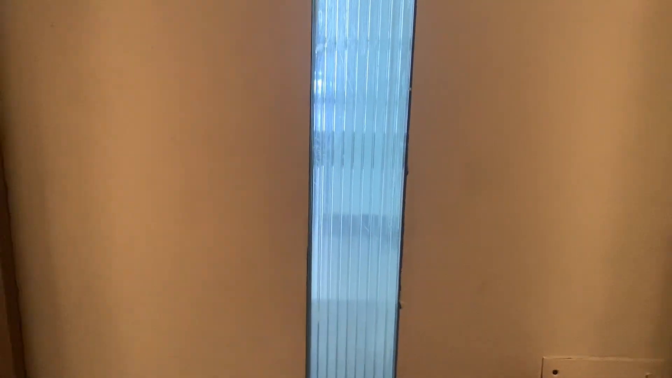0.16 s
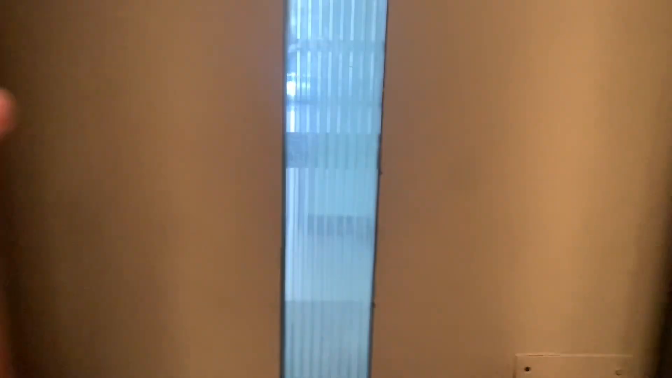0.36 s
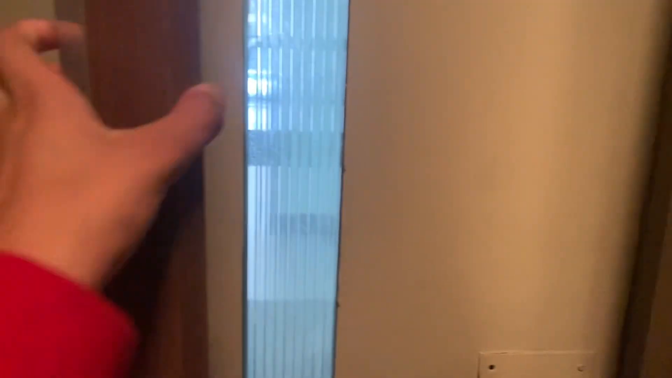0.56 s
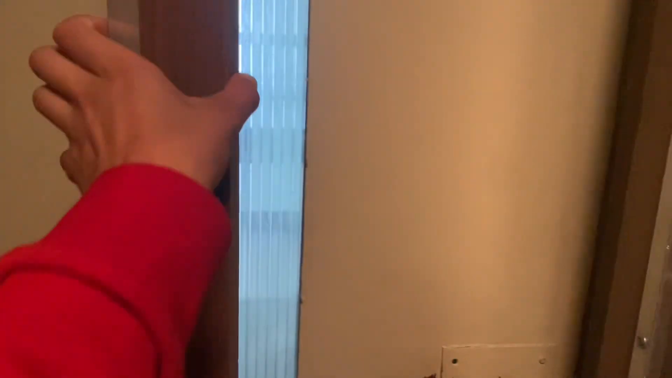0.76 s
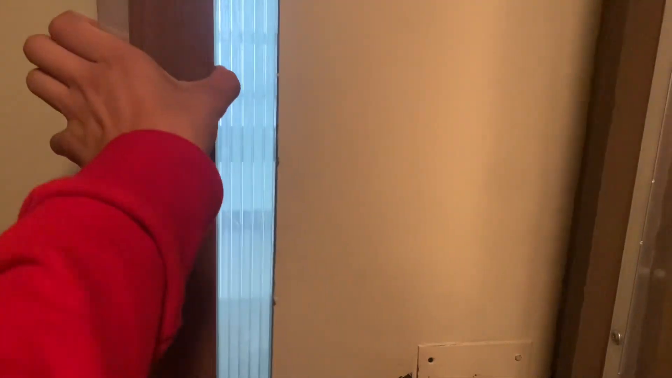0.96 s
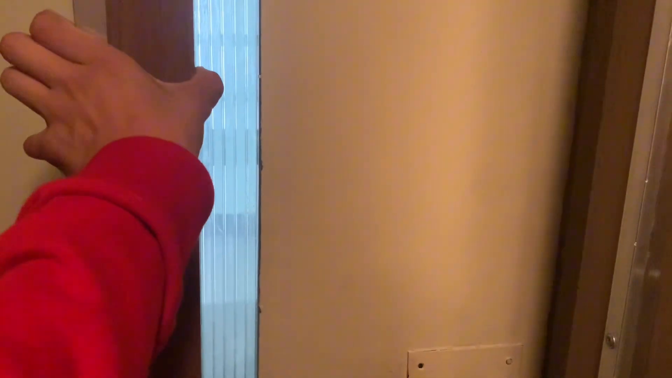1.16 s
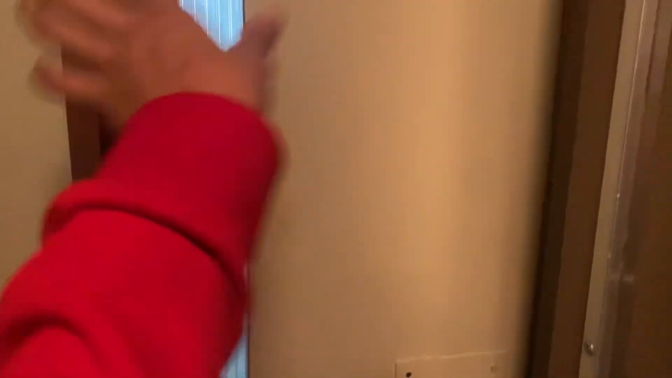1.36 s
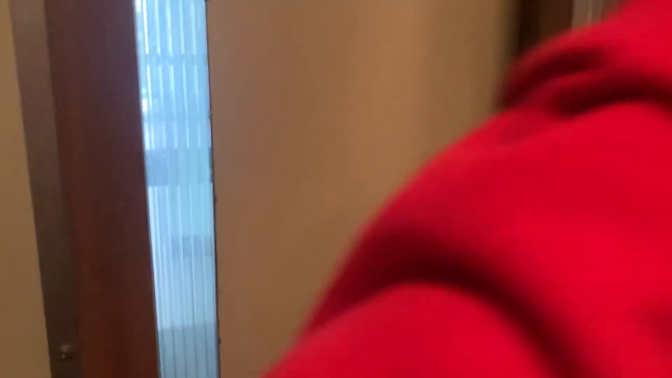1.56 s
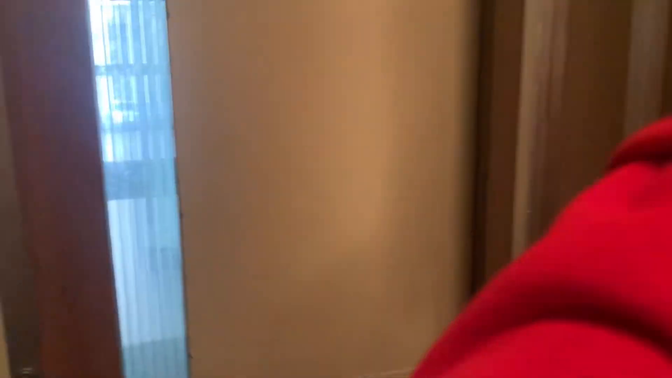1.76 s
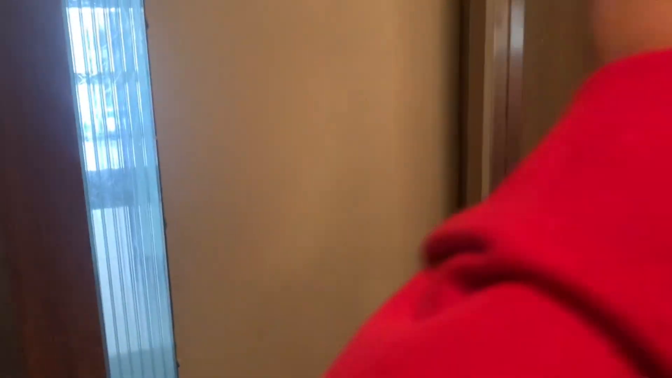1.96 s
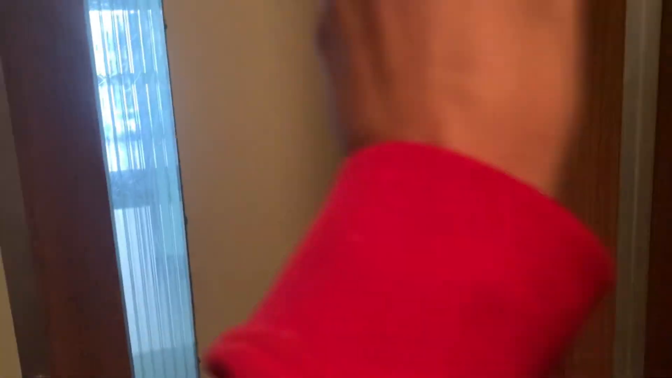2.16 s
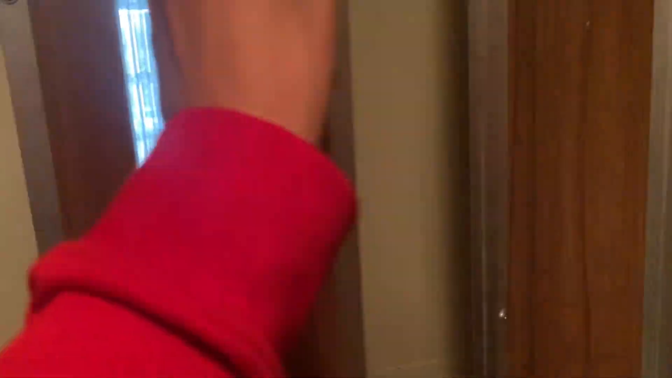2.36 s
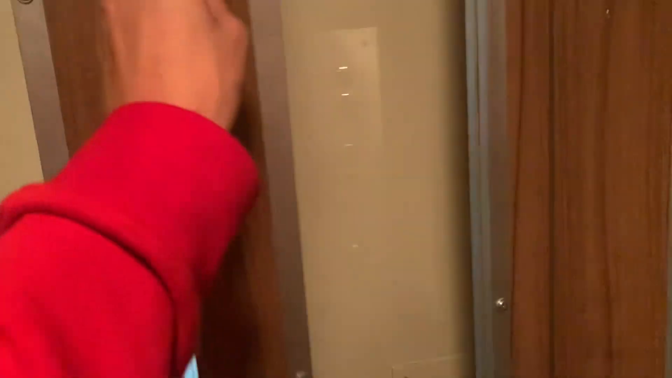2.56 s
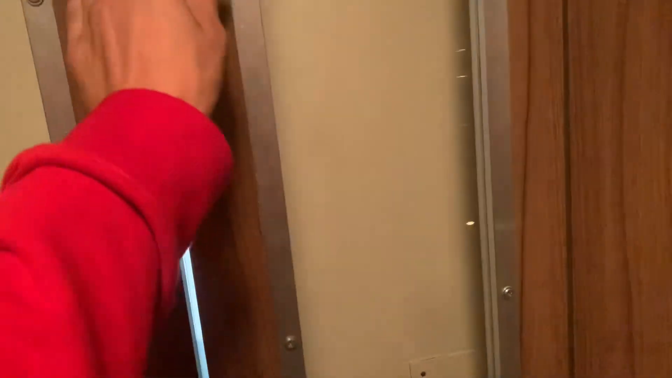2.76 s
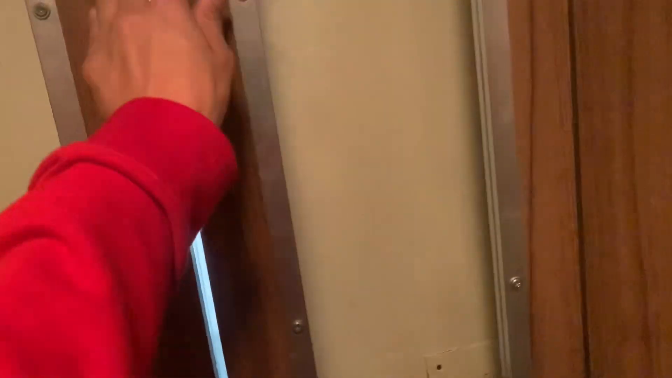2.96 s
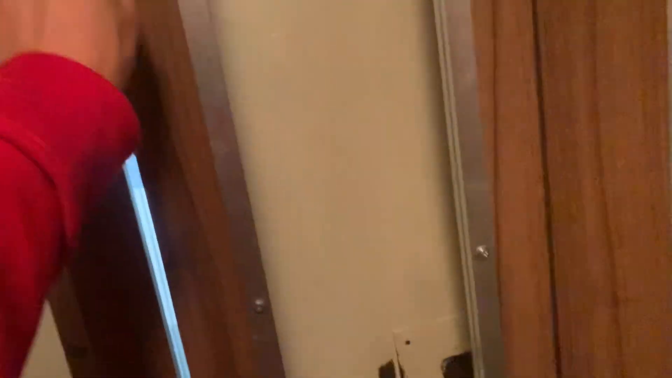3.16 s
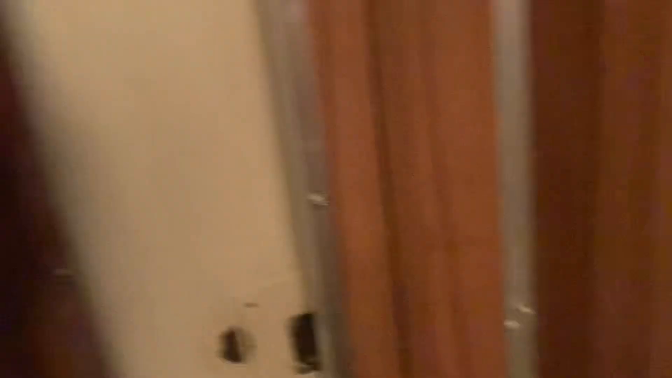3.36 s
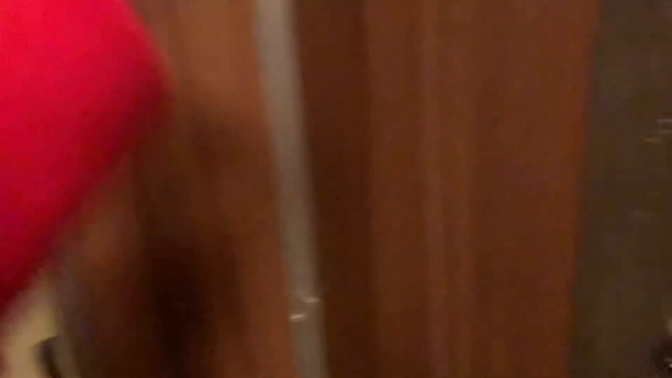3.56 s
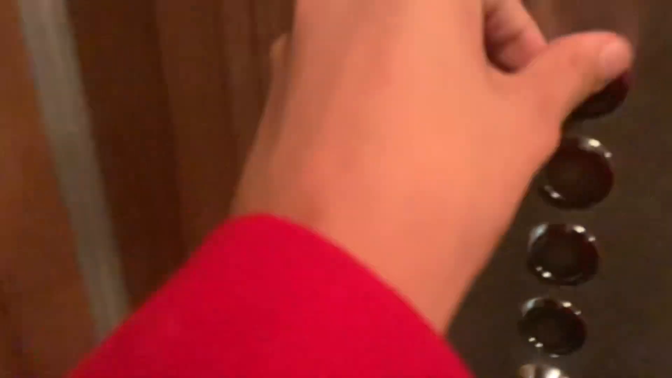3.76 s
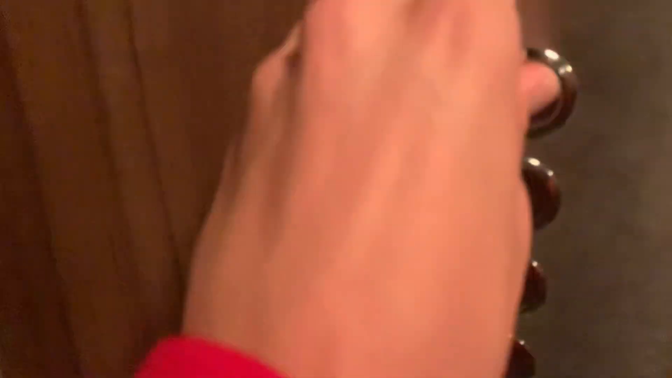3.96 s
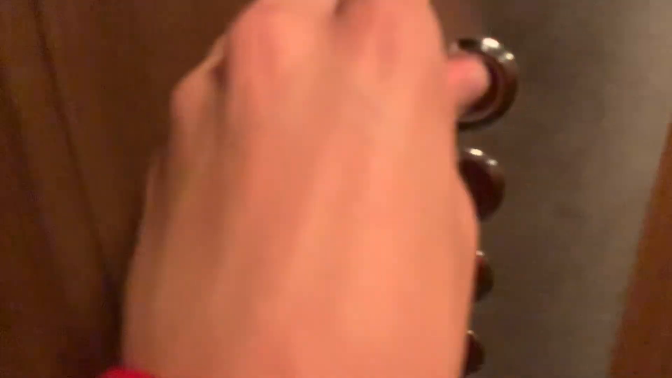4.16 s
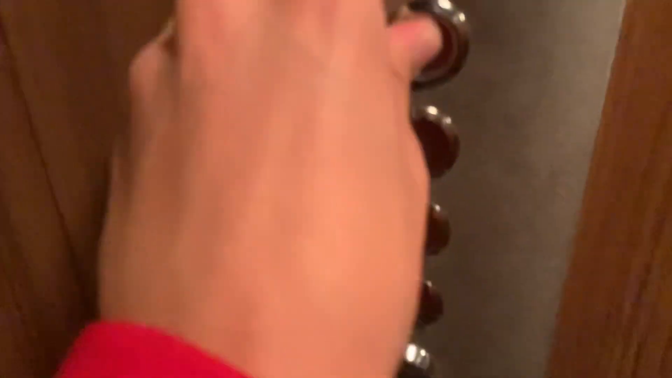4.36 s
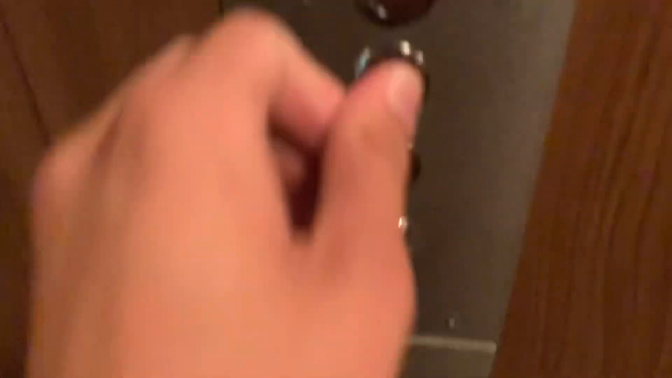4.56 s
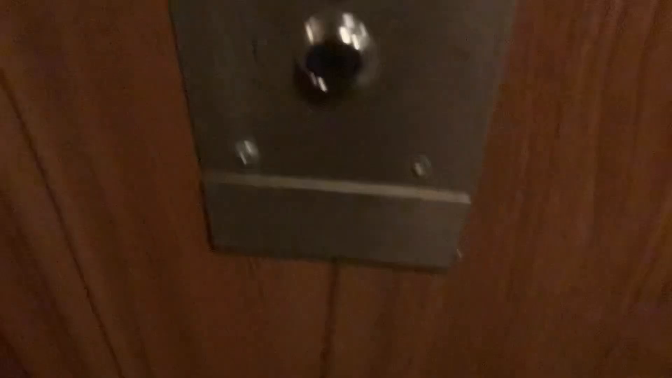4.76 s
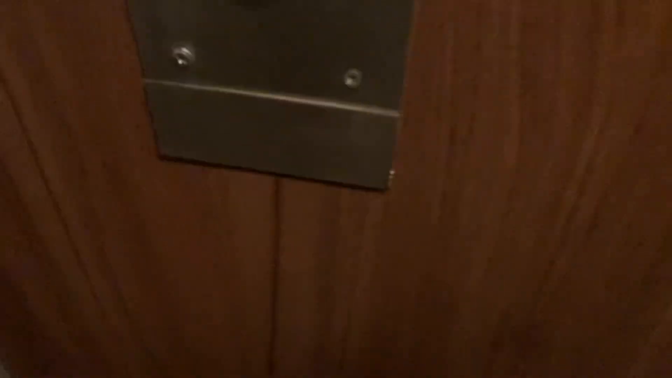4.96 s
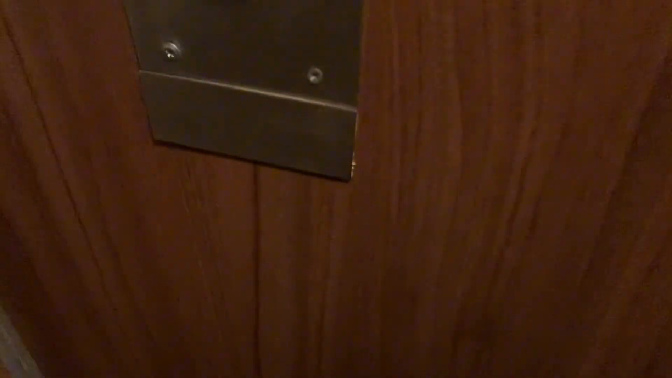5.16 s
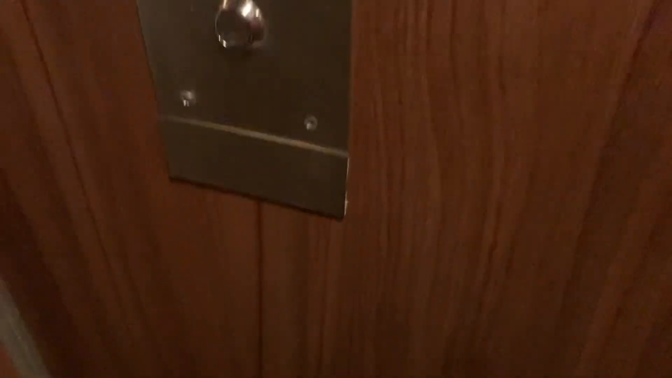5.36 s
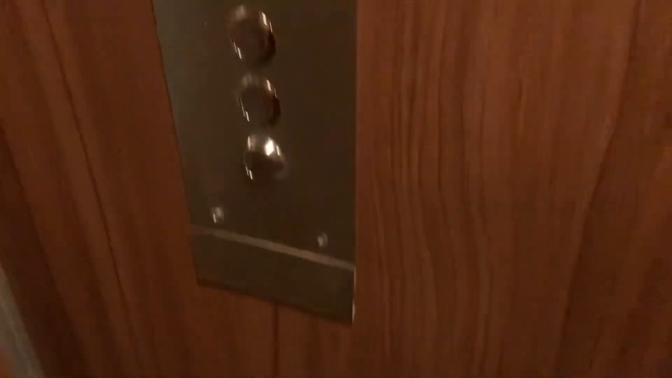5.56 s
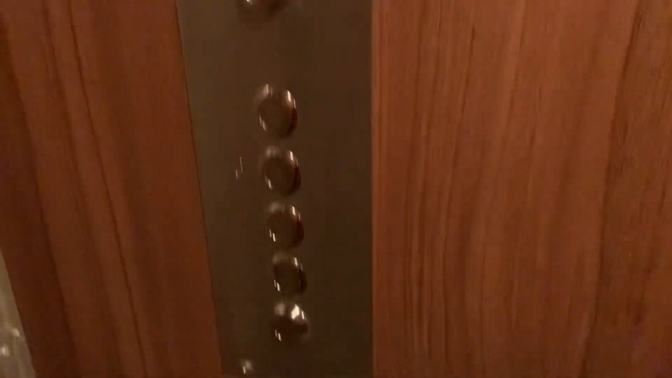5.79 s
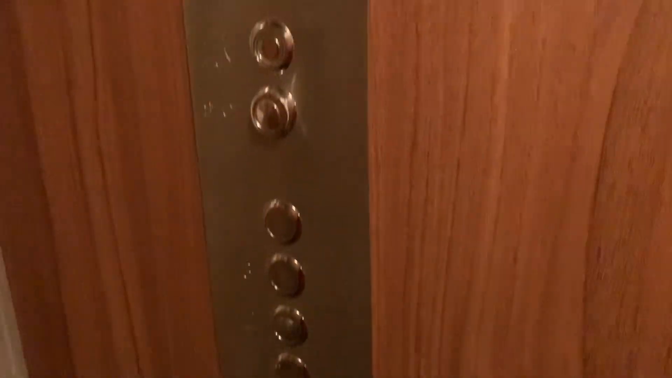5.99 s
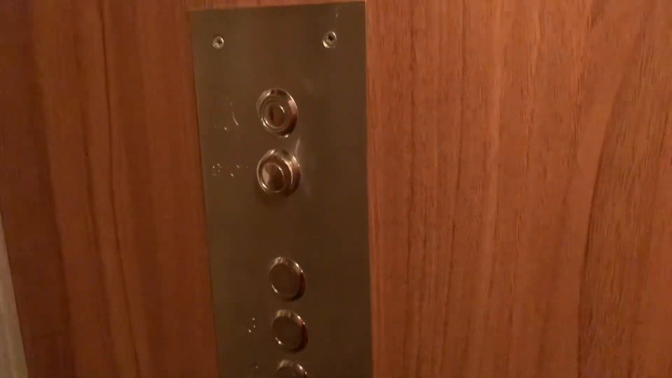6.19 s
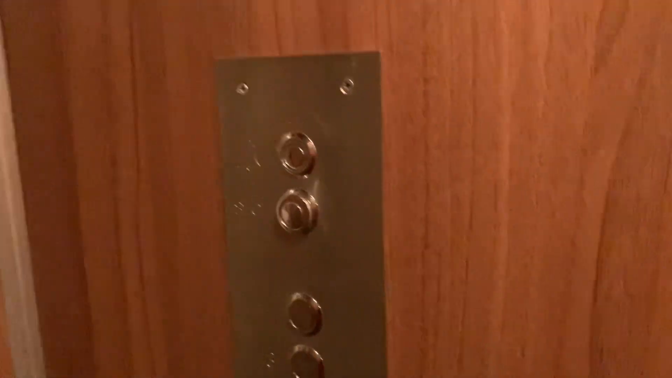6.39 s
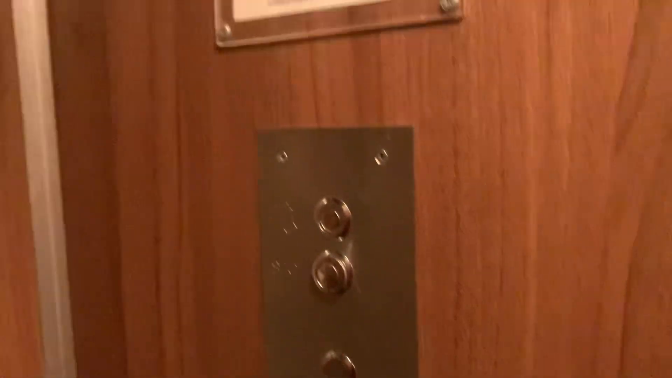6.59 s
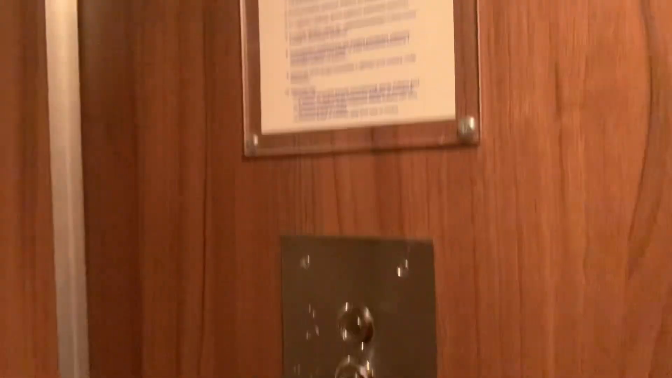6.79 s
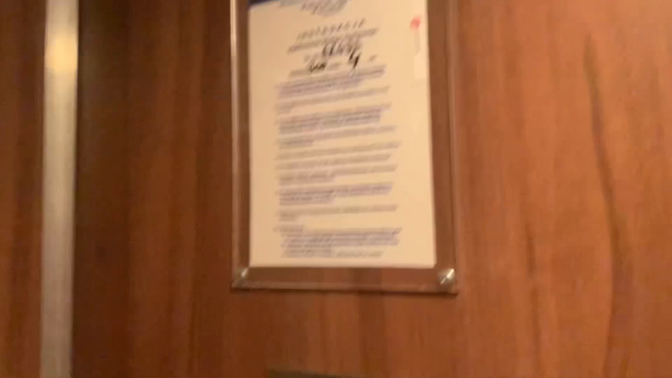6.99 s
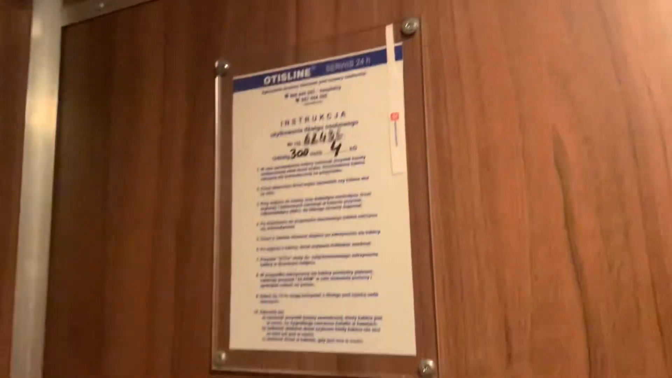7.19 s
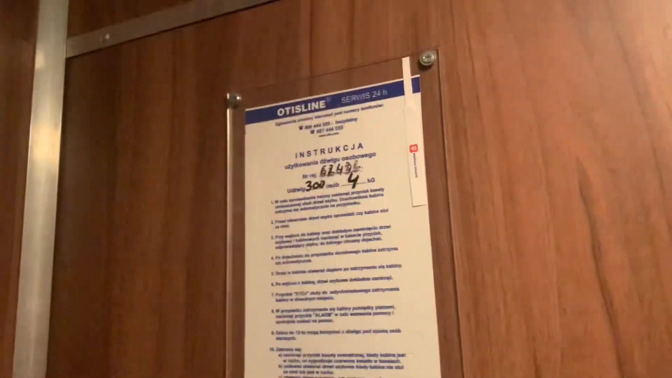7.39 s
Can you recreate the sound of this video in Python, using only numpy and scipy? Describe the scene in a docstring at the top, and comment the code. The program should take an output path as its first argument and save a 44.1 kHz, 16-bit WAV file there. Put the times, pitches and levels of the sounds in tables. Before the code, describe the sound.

The sound is heard close up, on a phone inside a small wooden lift. From the start, a door leaf is pushed by hand with faint squeaks, groans and scraping, then knocks home in a cluster of clacks and metal clinks from about 0.7 to 1.4 seconds. Around 1.9 to 2.5 seconds the second leaf scrapes and gives high, wavering squeaks. It shuts at about 2.9 seconds with a heavy clunk and deep thud, followed by smaller knocks. A button clicks near 3.9 seconds, and at 4.1 the lock slams, the loudest sound, briefly ringing through the car. Lighter clicks follow as the lift sets off with a low, resonant rumble that continues to the end at about 7.4 seconds. A few dry taps come between 5 and 7 seconds, with very faint rattling, and a faint hum rises in the last second.

```python
"""A small wooden lift sets off

Two door leaves are pushed shut by hand: stick-slip friction makes them scrape and squeak, and they
knock home in their damped modes. A button is pressed, the lock slams, and the car sets off with a low
resonant rumble, a faint hum and a few dry taps. A phone with two microphone ports listens inside
the car, from arm's length."""
import sys
import numpy as np
from scipy import signal
from scipy.fft import rfft, irfft, next_fast_len
from scipy.io import wavfile
from scipy.ndimage import uniform_filter1d

SR = 44100
rng = np.random.default_rng(int(sys.argv[2]) if len(sys.argv) > 2 else 0)


def to_wav(s):
    """Save 16-bit WAV."""
    ch = np.atleast_2d(s).T  # columns
    pcm = np.round(np.clip(ch, -1, 1) * 32767)  # PCM
    wavfile.write(sys.argv[1], SR, pcm.astype(np.int16))


N = 327663
FFT_SIZE = next_fast_len(N, True)

# Blows of door, latch and lock: t/s, mid, low, high and top level/dB, nominal T60/s,
# clink f/Hz, clink level/dB re mid
BLOWS = [(0.043, -37, -41, -53, -51, 0.32, 1150, -10), (0.068, -39.5, -29, -48, -53, 0.94, 1360, -9),
         (0.44, -33, -42.5, -49, -81, 0.41, 1210, -21), (0.662, -30.5, -38, -40, -42, 0.18, 2430, 5),
         (0.739, -42, -49.5, -38, -43, 0.16, 2455, 11), (0.889, -22, -25.5, -31, -36, 0.42, 2700, -8),
         (0.963, -32.5, -44.5, -30.5, -46, 0.3, 3940, 1), (0.989, -27, -30, -25.5, -24.5, 0.19, 4410, 1.5),
         (0.995, -34, -33, -45, -54, 0.26, 444, 15), (1.096, -34, -51, -58, -43.5, 0.23, 1835, -1),
         (1.145, -43, -34, -57, -60, 0.2, 1740, 8), (1.161, -33, -37.5, -42, -53, 0.31, 1630, -9),
         (1.263, -34, -31, -47.5, -46.5, 0.43, 1197, -2), (1.301, -42, -30.5, -39, -42.5, 0.2, 4520, 3.5),
         (1.333, -32.5, -38.5, -69, -68, 0.22, 1686, 0.5), (1.381, -56.5, -38, -51, -65, 0.14, 1236, 15),
         (1.872, -47, -50, -39.5, -46, 0.75, 4460, 7), (2.63, -50.5, -40, -40, -59.5, 0.086, 2850, 5),
         (2.814, -39.5, -32.5, -43, -48, .4, 1040, -19), (2.83, -34.5, -32.5, -46, -50.5, 0.52, 323, -1.5),
         (2.889, -32.5, -25, -45, -45.5, 0.21, 570, 3), (2.871, -22.5, -15, -24.5, -23, 0.17, 1770, 0),
         (2.873, -34.5, -33, -48.5, -54, .2, 464, 12), (2.945, -27, -24.5, -25.5, -27.5, 0.22, 1600, -17),
         (3.003, -41, -36, -61, -55, 0.11, 1330, 5), (3.04, -61.5, -44, -60, -61, .15, 1440, -1),
         (3.128, -36.5, -41.5, -56.5, -79, 0.22, 1200, -16),
         (3.229, -41.5, -34, -54.5, -54, 0.3, 1404, -0.5), (3.268, -42.5, -37, -59.5, -68, 0.4, 1960, -1),
         (3.326, -43, -39, -67.5, -63, 0.37, 1600, 1.5), (3.377, -52.5, -35, -72, -78, 0.18, 1620, 9.5),
         (3.787, -46.5, -47.5, -67, -83, 0.16, 1027, -12), (3.9, -51, -54, -52.5, -59.5, 0.2, 2700, 1),
         (3.913, -44.5, -55, -47, -30, 0.04, 2250, 8), (3.927, -53, -55.5, -42, -22.5, 0.027, 1700, 3.5),
         (3.927, -36.5, -38.5, -59, -37, 0.25, 2240, -7),
         (3.963, -28.5, -23.5, -71.5, -72.5, 0.16, 1252, 5), (3.97, -37.5, -31, -58, -76, 0.42, 2000, -7),
         (4.038, -34, -41, -49.5, -56, 0.44, 1126, 6), (4.045, -42.5, -44.5, -35, -31.5, 0.54, 4560, -1.5),
         (4.051, -27.5, -36, -38.5, -50, 0.57, 1290, 0.5), (4.091, -21, -12, -18, -9, 0.31, 2034, 4.5),
         (4.097, -10, -17.5, -22, -37, 0.17, 1156, 2), (4.39, -40, -45, -37.5, -31.5, 0.097, 2320, 4),
         (4.409, -29, -40, -49, -49, 0.2, 2266, -8), (4.332, -52.5, -39.5, -67, -73, .15, 1000, 4),
         (4.54, -40, -44, -55.5, -59.5, 0.43, 1240, -6), (4.746, -58.5, -40, -68.5, -74, .2, 880, 16),
         (4.777, -61, -40, -59, -77, .2, 480, 13), (4.885, -49, -45, -66, -73, 0.18, 1304, 2),
         (4.589, -47, -49.5, -58, -63, 0.41, 1880, -4)]
# Door modes: f/Hz, weight (0.5 dB per unit), longest T60/s
DOOR_MODES = [(183, -2.5, 0.42), (296.5, -4, 0.42), (397, 6.5, 0.44), (461.5, 16.5, 0.08),
              (634.8, -30, 0.41), (849, -24.5, 0.54), (830, 2.5, 0.092), (1073, -37, 0.65),
              (1048, -9, 0.13), (1117, -12.5, 0.28), (1220, -36.5, 0.31), (1390, -36.5, 0.39),
              (2013, -21, 0.27), (2160, -33.5, 0.07), (2690, -26.5, 0.14), (2686, -16.5, 0.032)]
# Low, mid, high and top band of the rattling tail: lower f/Hz, upper f/Hz, share of T60, gain/dB
TAIL_BANDS = [(280, 638, 0.9, -7), (786, 2710, 0.88, -9), (2860, 7130, 0.77, -2.5),
              (8200, 13100, 0.62, -3.5)]


def knocks():
    """Impact excitation: a crack, then door modes, a metal clink and a rattle decay exponentially."""
    rise_s, clink_rise_s, crack_decay_s = 0.0054, 0.0044, 0.00066
    pair_ratio, pair_db = np.array([[.99], [1.04]]), np.array([[3], [-4]])  # two beating clink modes
    out = np.zeros(N)
    hz, weight, mode_t60 = np.transpose(DOOR_MODES)[:, :, None]
    noise = [unit(band(rng.standard_normal(N + SR), lo, hi)) for lo, hi, *_ in TAIL_BANDS]
    draws = rng.standard_normal((len(BLOWS), 2, len(DOOR_MODES), 1))
    for blow, (level_draw, pitch_draw) in zip(BLOWS, draws):
        start, mid_db, low_db, high_db, top_db, t60, clink_hz, clink_db = blow
        t60 = np.clip(t60, .03, .7)
        t = np.arange(int(1.4 * t60 * SR)) / SR
        gain = undb(np.where(hz < 800, low_db, mid_db) + .5 * weight + 2.5 * level_draw - 13)
        detuned_hz = hz * (1 + 0.017 * pitch_draw)
        modes = gain * decay(t, np.minimum(mode_t60, 2 * t60)) * np.sin(2 * np.pi * detuned_hz * t)
        pair = (undb(pair_db) * np.sin(2 * np.pi * clink_hz * pair_ratio * t)).sum(axis=0)
        clink = undb(mid_db + clink_db) * decay(t, min(0.42 * t60, 0.06)) * pair
        band_db = low_db, mid_db, high_db, top_db
        bands = [undb(db) * x[int(start * SR):][:len(t)] for db, x in zip(band_db, noise)]
        tail = sum(undb(db) * decay(t, share * t60) * x
                   for (_, _, share, db), x in zip(TAIL_BANDS, bands))
        crack = undb(-4) * np.exp(-t / crack_decay_s) * sum(bands[1:])
        body = (modes.sum(axis=0) + tail) * onset(t, rise_s)
        add(out, start, body + clink * onset(t, clink_rise_s) + crack)
    return out


# Heavy blows that ring the whole car: t/s, shell level/dB, sway level/dB
HEAVY_BLOWS = [(2.873, -36, -40), (2.904, -36, -21), (2.924, -37, -15), (2.949, -34, -12),
               (4.09, -7.5, -24.5)]
# Modes of the shell and of its deep sway: f/Hz, relative level/dB, T60/s
SHELL_MODES = [(95.5, -3.5, 0.28), (165, -8, 0.14), (267, 3, 0.14), (376.3, -20.5, 0.64), (483, -13, 0.23),
               (960, -18, .3), (1230, -21.5, .2), (586, -6.5, 0.17), (2100, -16, 0.18)]
SWAY_MODES = [(42, 4.5, .2), (65, -6.5, .16), (100, -8, .15), (141, -10, 0.35)]


def thumps():
    """Free vibration: the low modes of the car swell within milliseconds of a blow and die away."""
    out, t = np.zeros(N), np.arange(SR) / SR
    shell, sway = (sum(undb(db) * decay(t, t60) * np.sin(2 * np.pi * hz * t) for hz, db, t60 in modes)
                   for modes in (SHELL_MODES, SWAY_MODES))
    for start, shell_db, sway_db in HEAVY_BLOWS:
        add(out, start, undb(shell_db) * shell * onset(t, .004) + undb(sway_db) * sway * onset(t, .0039))
    return out


# Slips of the hinges and of the sliding leaf: t/s, duration/s, f/Hz, glide/(Hz/s), relative level/dB,
# level change/dB, levels of harmonics 2, 3, ../dB re fundamental
HINGE_SQUEAKS = [(0.065, 0.067, 1426, -2, -47, -7, ()), (0.07, 0.042, 2620, -600, -45.5, -6, ()),
                 (0.07, 0.047, 3360, 0, -46.5, -6, ()), (0.135, 0.1, 3360, -200, -53, 0, ()),
                 (0.15, 0.049, 1230, 1, -46.5, -5, ()), (0.195, 0.096, 2890, 0, -55, 1, ()),
                 (0.21, 0.072, 1444, 0, -41, -4.5, ()), (0.285, 0.052, 1447, -200, -46, -2, ()),
                 (1.94, 0.065, 1567, -330, -33.5, 0.5, (-11, -2, -16, -9, -7, -17, -5)),
                 (2.0, 0.042, 1549, -200, -34, -3.5, (-11, -6, -9, -12.5, -2)),
                 (1.94, 0.093, 4480, -4, -46, 0.5, ()), (2.02, 0.072, 2800, -500, -41.5, -13, ()),
                 (2.03, 0.07, 3600, 3001.5, -45, 1.5, ()), (2.035, 0.036, 3340, 498, -44.5, -9.5, ()),
                 (2.04, 0.046, 5200, 2499, -44, 2, ()),
                 (2.052, 0.11, 1534, -900, -40, -19, (-31.5, -6, -27.5, -7.5)),
                 (2.072, 0.11, 3470, -700, -38, 0.5, (1, -3, -19.5)),
                 (2.07, 0.052, 4930, -500, -39, -8, ()), (2.16, 0.045, 6420, -1800, -44, 4, ()),
                 (2.18, 0.062, 3400, 0, -48.5, -8.5, (8,)), (2.19, .05, 4410, -200, -44.5, 0.5, ()),
                 (2.16, 0.038, 1236, -200, -52.5, 5.5, ()), (2.185, .045, 1145, -400, -46, 5.5, (-1.6,)),
                 (2.222, .05, 1102, 300, -31, 1, (-14.5,)), (2.218, 0.066, 1246, 302.5, -37.5, -4, (-9,)),
                 (2.268, 0.062, 1070, 399, -43, 1.5, ()), (2.295, 0.072, 1246, 351, -40.5, -2, (-20,)),
                 (2.328, 0.057, 1145, 200, -39.5, -6, (-13,)), (2.35, .09, 1245, 0, -42, -8, ()),
                 (2.39, 0.049, 1078, -2, -51.5, -3, ()), (2.75, 0.079, 2080, -1500, -64, -6, ())]
LEAF_GROANS = [(0.04, 0.055, 471, -400, -37.5, 4, ()), (0.095, 0.035, 420, 3, -37.5, -6, ()),
               (.15, 0.032, 457, 0, -42.5, 1, ()), (0.22, 0.1, 470, -67, -34, -14, ()),
               (0.365, 0.15, 444, -6, -37.5, -25, ()), (0.39, 0.11, 1070, 900, -52, -6, ()),
               (0.59, 0.12, 1400, 4000, -51.5, 4, ()), (.32, .05, 846, 0, -48.5, -5, ()),
               (.55, 0.063, 894, 0, -54, -1, ()), (1.905, 0.089, 470, 8.5, -39.5, -2.5, ()),
               (2.25, 0.14, 480, 99, -38, -13, ()), (2.4, 0.18, 488.7, -130, -37.5, 1.5, ())]


def stick_slip(slips, wander, flutter_db):
    """Relaxation oscillation: harmonics of a gliding, wandering slip rate, each fluttering alone."""
    out, size, edge_s = np.zeros(N), SR // 4, 0.009
    t = np.arange(size) / SR
    for start, length, hz, glide, db, change_db, overtones in slips:
        gate = np.clip(np.minimum(t, length - t) / edge_s, 0, 1) ** 2
        slip_hz = (hz + glide * t) * (1 + wander * walk(247.5, size))
        phase = 2 * np.pi * np.cumsum(slip_hz) / SR
        tone = sum(undb(part_db + flutter_db * (walk(60, size) + walk(350, size))) * np.sin(k * phase)
                   for k, part_db in enumerate((0, *overtones), 1))
        add(out, start, gate * undb(db + change_db * t / length) * tone)
    return out


# Pushes of a leaf along its track, later brief rustles of shifting parts:
# t/s, rise/s, hold/s, scrape, dull, bright and hiss level/dB
PUSHES = [(0.05, .012, 0.042, -50, -47, -54, -67), (0.156, 0.22, 0.096, -38.5, -43, -46, -52),
          (0.25, .02, 0.021, -48.5, -50, -68, -62), (0.512, 0.22, 0.034, -45.5, -49, -55, -60),
          (0.664, 0.012, 0.016, -39, -64, -50.5, -73), (0.74, .015, 0.097, -46, -56, -55, -77),
          (1.894, 0.035, 0.046, -42, -42, -40.5, -42), (1.995, 0.044, 0.043, -44, -54.5, -37.5, -35.5),
          (2.037, 0.034, 0.013, -40.5, -69, -36, -33), (2.057, .02, 0.17, -46, -56, -43, -34),
          (2.238, 0.1, 0.0067, -36.5, -34, -34.5, -55.5), (2.272, .02, 0.053, -44, -42.5, -53.5, -49),
          (2.629, 0.013, 0.0055, -49.5, -77, -64, -79), (4.625, 0.054, 0.018, -52.5, -72, -54.5, -56.5),
          (4.897, .04, 0.018, -56.5, -56, -78, -80), (5.193, 0.1, 0.02, -63.5, -61, -73.5, -75),
          (5.469, 0.025, 0.038, -53, -60, -64, -67)]
# Rubbing of leaves and linkage in between: t/s, scrape, dull and treble level/dB
RUB_FLOOR = [(0.0, -77, -67, -74), (0.37, -57.5, -48, -68), (0.88, -44, -57.5, -92), (1.25, -98, -62, -68),
             (1.55, -67, -65, -80), (1.85, -86.5, -84.5, -90), (2.36, -50.5, -38.5, -51.5),
             (2.62, -58, -57, -68.5), (2.74, -71, -66.5, -87), (2.86, -52, -41, -72),
             (3.19, -61, -64.5, -85), (3.38, -71, -59, -78.5), (3.6, -74, -78.5, -79),
             (3.88, -73, -82.5, -85), (4.08, -57.5, -54, -70.5), (4.59, -58.5, -59, -67),
             (4.95, -65, -58.5, -68), (5.3, -75, -66, -85.5), (5.62, -73, -65, -81),
             (6.16, -81, -71.5, -95), (6.48, -81, -72.5, -90), (6.75, -69.5, -64.5, -83),
             (6.9, -63.5, -54.5, -74), (7.43, -74.5, -68.5, -85)]
# Resonances of leaf and frame: f/Hz, bandwidth/Hz, relative level/dB
LEAF_MODES = [(2385, 60, 2), (2640, 80, 0), (2820, 60, 1), (3360, 70, 3), (3540, 110, 0), (3890, 80, -1),
              (4400, 160, -1)]
FRAME_MODES = [(878, 130, 3), (1050, 66, 4.5), (1225, 81, 7), (1447, 40, 1), (1533, 95, 1.5),
               (1780, 53, -1.5), (1958, 51, 2), (1690, 1600, -9)]


def rubbing():
    """Sliding friction: uneven stick-slip grains ring leaf and frame, louder with the pressure."""
    scrape_db, dull_db, treble_db = curves(RUB_FLOOR)
    rise_db, hiss_db = 33.5, treble_db - 5.5
    pushes = [(start, rise_db / rise_s, *rest) for start, rise_s, *rest in PUSHES]
    gains = swells([scrape_db, dull_db, treble_db, hiss_db], pushes, fall_db_s=210.5)
    grain = undb(1.3 * walk(150) + 1.7 * walk(25))
    grit = lambda: grain * rng.standard_normal(N)
    sliding = np.interp(np.arange(N) / SR, [0, 2.2, 2.6], [1.1, 1.1, .2])  # a leaf at rest rings less
    ring = sum(undb(db + 5 * walk(22)) * resonate(grit(), [(hz, width, 0)])
               for hz, width, db in LEAF_MODES)
    scrape = unit(sliding * unit(ring) + unit(band(grit(), 1900, 4600)))
    dull = unit(band(resonate(grit(), FRAME_MODES), 770, 3100))
    bright = unit(band(grit(), 5500, 9000))
    hiss = unit(band(grit(), 9000, 15000))
    return np.sum(gains * [scrape, dull, bright, hiss], axis=0)


# Steady shaking of the car: t/s, boom, wall drone and hollow door level/dB
SHAKING = [(0.0, -42.5, -88, -48), (0.48, -50, -63.5, -54), (0.85, -50.5, -56.5, -52),
           (1.01, -36, -73, -49), (1.26, -33.5, -60, -48), (1.5, -32.5, -81, -65),
           (1.74, -45.5, -67.5, -60), (2.08, -56, -58, -45), (2.2, -38.5, -39.5, -42.5),
           (2.55, -49, -46, -53), (2.78, -46.5, -52, -53), (3.0, -30, -59, -55.5),
           (3.42, -38, -44.5, -68.5), (3.58, -43, -78, -71), (3.85, -43.5, -58, -59.5),
           (4.07, -38.5, -29.5, -54.5), (4.22, -38, -31.5, -39), (4.52, -36.5, -36, -48.5),
           (4.8, -36.5, -44.5, -46), (5.2, -41, -46, -59.5), (5.5, -39, -54, -52.5),
           (6.35, -41.5, -53, -59.5), (7.43, -38.5, -58.5, -55)]
# Brief swells in the low boom and hollow ring: t/s, hold/s, boom level/dB, hollow door level/dB
RUMBLE_SWELLS = [(0.147, .02, -36, -42), (0.695, 0.021, -45, -65), (0.951, .06, -44.5, -35.5),
                 (1.081, 0.12, -34.5, -52), (1.294, 0.16, -35, -48), (2.145, 0.11, -37.5, -61),
                 (2.297, 0.071, -35, -33.5), (2.464, 0.029, -38, -37.5), (2.635, 0.013, -44, -52),
                 (2.902, .02, -29, -28), (3.002, .04, -27.5, -54), (3.273, 0.046, -29.5, -44),
                 (3.467, .02, -33, -54), (4.029, .02, -30, -39), (4.135, 0.052, -21, -29),
                 (4.303, 0.011, -24, -50), (4.457, 0.024, -29, -47), (4.571, 0.036, -28, -62),
                 (4.819, 0.12, -30.5, -68.5), (5.132, 0.06, -30, -47.5), (5.395, 0.025, -30, -69),
                 (6.353, .02, -36.5, -67.5), (6.531, .02, -34.5, -52.5), (6.731, 0.028, -40, -48),
                 (6.941, 0.014, -26, -43.5), (7.19, 0.023, -32, -65.5)]
# Balance of the boom: t/s, level of the two lowest car modes/dB re the upper two
BOOM_TILT = [(0, 2), (.8, 1.5), (1.1, 6), (1.5, 1.5), (2.2, -3), (2.9, 0.5), (3.2, -1), (3.7, 3), (4.1, -2),
             (4.6, -2), (5.6, 3), (6.4, -2.5), (7.43, -2)]
# Resonances of car, walls and hollow door: f/Hz, bandwidth/Hz, relative level/dB
CAR_MODES = [(30.4, 3.9, -5.5), (47, 13.9, -3), (66, 24, -2), (85.2, 18.5, 0)]
WALL_MODES = [(141, 150, -6.5), (185.7, 19, 1.5), (284, 59, 1.5)]
HOLLOW_MODES = [(325, 43, 2), (383, 67, 0), (463, 32, 1.5), (488.5, 18, 3.5), (554, 70, -1),
                (708, 71, -8.5)]


def rumble():
    """Forced vibration: random shaking booms in the car, drones in its walls and rings the door."""
    boom_db, drone_db, hollow_db = curves(SHAKING)
    rise_db_s = 258
    peaks = [(start, rise_db_s, *rest) for start, *rest in RUMBLE_SWELLS]
    boom_gain, hollow_gain = swells([boom_db, hollow_db], peaks, fall_db_s=145.5)
    shake, tilt = rng.standard_normal(N), undb(curves(BOOM_TILT)[0] / 2)
    boom = tilt * resonate(shake, CAR_MODES[:2]) + resonate(shake, CAR_MODES[2:]) / tilt
    drone = resonate(rng.standard_normal(N) * undb(2.3 * walk(40)), WALL_MODES)
    hollow = resonate(rng.standard_normal(N) * undb(3 * walk(60)), HOLLOW_MODES)
    return (boom_gain * unit(band(boom, 23, 170))
            + undb(drone_db) * unit(band(drone, 120, 230))
            + hollow_gain * unit(band(hollow, 180, 550)))


# Dry taps close to the phone: t/s, level/dB, f/Hz, click level/dB, rise/ms
DRY_TAPS = [(4.588, -28.5, 200, -70, 1.5), (5.017, -32, 482, -63, 3), (5.047, -37, 341, -65, 2.5),
            (5.104, -53.5, 311, -66, 1.7), (5.177, -42, 522, -70, 1.5), (5.199, -33.5, 335, -67, 2),
            (5.376, -24, 537.5, -59, 1.6), (5.91, -44, 310.6, -75.5, 1.5), (6.184, -48.5, 566, -83, 0.91),
            (6.348, -21, 514, -61, 0.5), (6.512, -36, 391, -86, 2.7), (6.668, -54, 1480, -80, 0.96),
            (6.941, -32, 797, -48, 0.43), (6.948, -23.5, 373, -65.5, 0.47), (6.975, -36, 465, -58, 1.6),
            (7.017, -33.5, 350.5, -58, 0.93), (7.101, -36, 461, -70, 1.6)]
# Modes of the tapped panel: frequency ratio, relative level/dB, time to peak/ms
PANEL_MODES = [(2.15, -0.5, 0.72), (1.0, 3, 1.7), (1.25, -16, 5), (.37, -6, 3.5)]


def taps():
    """Heavy damping: brief panel modes follow a tiny click; a soft touch hardly wakes the top one."""
    out, t = np.zeros(N), np.arange(SR // 16) / SR
    ratio, mode_db, peak_ms = np.transpose(PANEL_MODES)[:, :, None]
    age = 1000 * t / peak_ms
    for start, db, hz, click_db, rise_ms in DRY_TAPS:
        click = unit(band(rng.standard_normal(len(t)), 2000, 4600)) * np.exp(-t / 0.0029)
        rise = 1 - np.exp(-(1000 * t / rise_ms) ** 2)
        modes = undb(db + mode_db) * age * np.exp(1 - age) * np.sin(2 * np.pi * hz * ratio * t)
        add(out, start, rise * modes.sum(axis=0) + undb(click_db) * click)
    return out


# Tones of the drive at full strength: f/Hz, level/dB
DRIVE_TONES = [(300, -51.5), (194, -64), (108, -55)]


def drive_hum():
    """Random modulation: the tones waver in level and phase, and come up once the car is under way."""
    t = np.arange(N) / SR
    hum = sum(undb(db + 4.1 * walk(3.6) + 3.2 * walk(25)) * np.sin(2 * np.pi * hz * t + .8 * walk(9))
              for hz, db in DRIVE_TONES)
    return hum * np.clip((t - 6.5) / .65, .25, 1)


# Rattles of the guides during travel: start t/s, end t/s, fade/s, pulse rate/Hz, unevenness/dB,
# level/dB, resonances (f/Hz, bandwidth/Hz, relative level/dB)
GUIDE_RATTLES = [(5.589, 6.352, .23, 17, 3.5, -65.5, [(1215, 81, 0)]),
                 (6.604, 6.943, 0.087, 30, 2.2, -60, [(1375, 82, 8.5), (1980, 240, -2.5), (2220, 70, -2),
                 (3780, 440, -10)])]


def guide_chatter():
    """Amplitude modulation: noise in the resonances of the guides comes in faint, uneven pulses."""
    out, t = np.zeros(N), np.arange(N) / SR
    for start, end, fade, rate, uneven_db, db, modes in GUIDE_RATTLES:
        gate = np.clip(np.minimum(t - start, end - t) / fade, 0, 1)
        out += gate * undb(db + uneven_db * walk(2 * rate)) * resonate(rng.standard_normal(N), modes)
    return out


# Spectrum of the air in the shaft: f/Hz, relative spectral density level/dB
SHAFT_SPECTRUM = [(400, -27.5), (700, 9.5), (1300, -12), (2500, -26), (6000, -27), (11000, -16),
                  (16000, -26.5)]


def shaft_air():
    """Spectrally shaped noise: the quiet hiss of the shaft drifts slightly in level."""
    gain = undb(-69 + 0.5 * walk(1.5))
    spectrum = rfft(rng.standard_normal(FFT_SIZE)) * undb(per_bin(SHAFT_SPECTRUM))
    return gain * unit(irfft(spectrum, FFT_SIZE)[:N])


def undb(db):
    """Amplitude ratio of a level in dB."""
    return 10 ** (np.asarray(db) / 20)


def unit(x):
    """Normalisation to an RMS of 1."""
    return x / np.sqrt(np.mean(x ** 2))


def decay(t, t60):
    """Exponential decay by 60 dB in t60 seconds."""
    return undb(-60 * t / t60)


def onset(t, rise_s):
    """First-order rise with time constant rise_s."""
    return 1 - np.exp(-t / rise_s)


def band(x, lo_hz, hi_hz):
    """Maximally flat band-pass filter."""
    return signal.sosfilt(signal.butter(2, [lo_hz, hi_hz], "bandpass", fs=SR, output="sos"), x)


def resonate(x, modes):
    """Modal superposition: parallel resonators of alternating sign, scaled to an RMS of 1."""
    return unit(sum((-1) ** k * undb(db) * signal.lfilter(*signal.iirpeak(hz, hz / width, SR), x)
                    for k, (hz, width, db) in enumerate(modes)))


def walk(rate, size=N):
    """Low-pass noise: random values held 1 / rate seconds and smoothed twice, with a spread near 1."""
    hold = int(SR / rate)
    steps = np.repeat(rng.standard_normal(size // hold + 1), hold)
    return 1.334 * uniform_filter1d(uniform_filter1d(steps, hold), hold)[:size]


def curves(table):
    """Linear interpolation of each column over the times in the first."""
    times, *columns = np.transpose(table)
    return [np.interp(np.arange(N) / SR, times, column) for column in columns]


def per_bin(table):
    """Interpolation of levels over log frequency, one for each FFT bin."""
    hz, db = np.transpose(table)
    return np.interp(np.log(np.fft.rfftfreq(FFT_SIZE, 1 / SR) + 1), np.log(hz + 1), db)


def add(out, start, x):
    """Superposition of x on out from start seconds."""
    i = int(start * SR)
    out[i:i + len(x)] += x[:N - i]


def swells(floors_db, rows, fall_db_s):
    """Incoherent addition: each layer's gain comes from the power of its floor plus its swells."""
    power, t = undb(2 * np.array(floors_db)), np.arange(-SR // 4, SR // 2) / SR
    for peak_s, rise_db_s, hold_s, *layer_db in rows:
        shape_db = np.minimum(rise_db_s * np.minimum(t, 0), -fall_db_s * np.maximum(t - hold_s, 0))
        i = int(peak_s * SR) - SR // 4
        shape = undb(2 * shape_db)[max(-i, 0):N - i]
        power[:, max(i, 0):max(i, 0) + len(shape)] += undb(2 * np.array(layer_db))[:, None] * shape
    return np.sqrt(power)


# Balance of the two ports: f/Hz, left level/dB re right
PORT_BALANCE = [(60, -2.5), (110, -3.0), (200, -2.0), (380, -0.5), (700, 0.0), (1290, 0.0), (2380, -0.5),
                (4400, -0.5), (8120, -1.0), (15000, 0.0)]
# Sound scattered in the cabin: f/Hz, side level/dB re mid
SIDE_LEVEL = [(60, -9.5), (110, -7.5), (200, 0.5), (380, -6.5), (700, 3.5), (1290, -1), (2380, 1),
              (4400, -1), (8120, 1.5), (15000, 0)]


def scene():
    """Two-point reception: the ports differ by scattered sound, in the treble mainly by a small lag."""
    port_lag_s, in_phase_hz, treble_scatter_db = 1 / 4750, 6250, -22.5
    squeaks = undb(8) * stick_slip(HINGE_SQUEAKS, wander=.0065, flutter_db=2.7)
    groans = undb(4) * stick_slip(LEAF_GROANS, wander=.025, flutter_db=2.6)
    coherent = squeaks + groans + taps() + thumps()
    # the noisy sources are drawn afresh for the direct and the scattered sound
    noisy = lambda: rumble() + drive_hum() + rubbing() + knocks() + guide_chatter() + shaft_air()
    direct, scattered = (rfft(coherent + noisy(), FFT_SIZE) for _ in range(2))
    hz, sign = np.fft.rfftfreq(FFT_SIZE, 1 / SR), np.array([[1], [-1]])  # left, right
    side = -1j * undb(per_bin(SIDE_LEVEL)) * scattered  # in quadrature
    lag = np.exp(-1j * sign * np.pi * port_lag_s * (hz - in_phase_hz))
    lower = direct + sign * side
    treble = lag * (direct + sign * undb(treble_scatter_db) * scattered)
    crossfade = np.clip((hz - in_phase_hz) / 1500, 0, 1)
    balance = undb(sign * per_bin(PORT_BALANCE) / 2)
    return irfft(((1 - crossfade) * lower + crossfade * treble) * balance, FFT_SIZE)[:, :N]


def record(dry):
    """Soft saturation and band limiting: the phone rounds the loudest peak and cuts above 16 kHz."""
    lowpass = signal.ellip(10, .2, 80, 16000, fs=SR, output="sos")
    return signal.sosfilt(lowpass, np.tanh(0.73 * dry) / 0.89)


dry = scene()
out = record(dry)
to_wav(out)
```